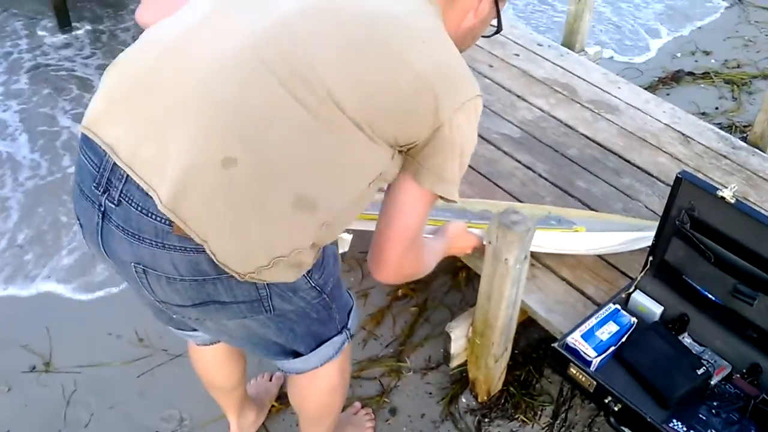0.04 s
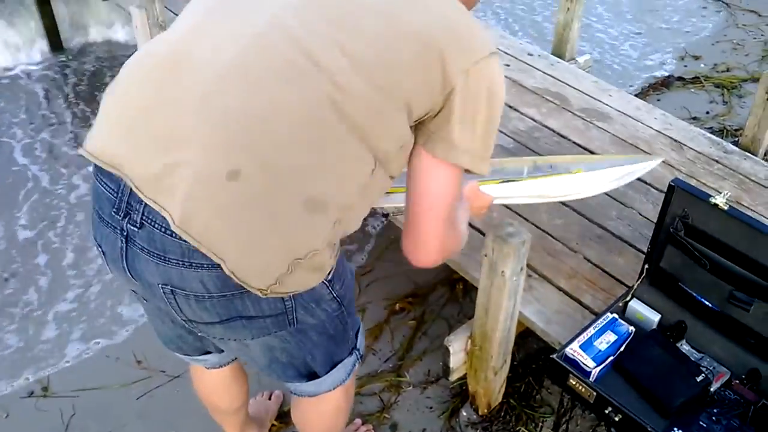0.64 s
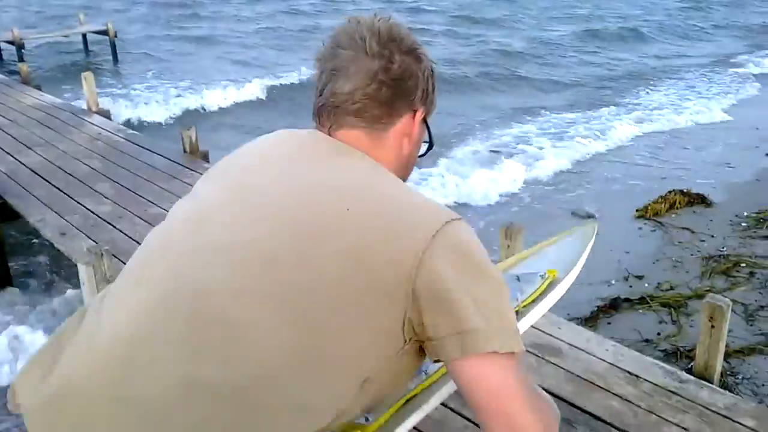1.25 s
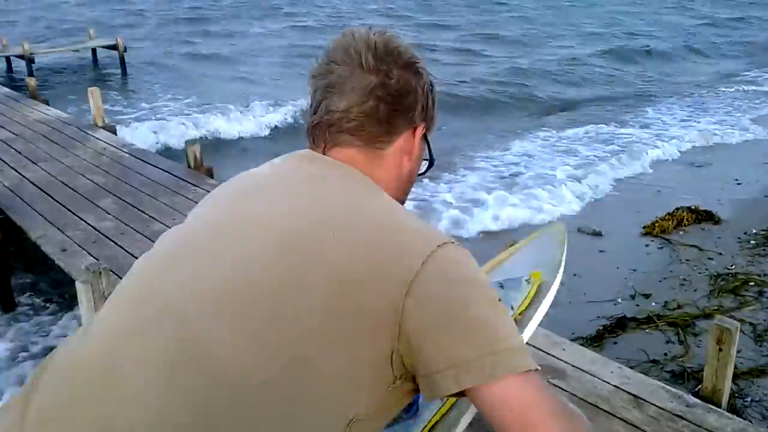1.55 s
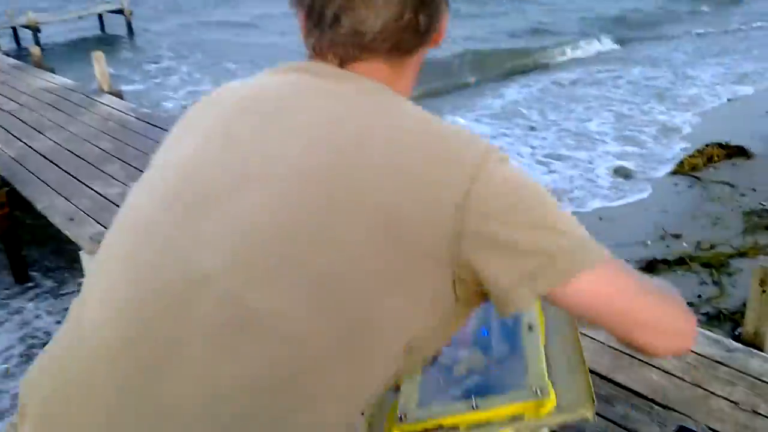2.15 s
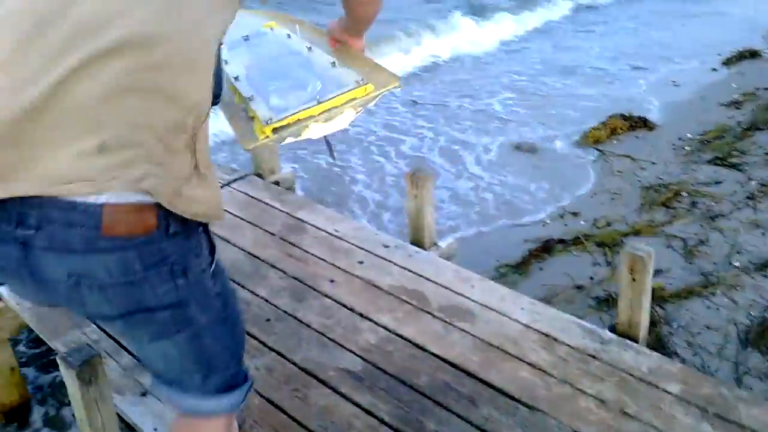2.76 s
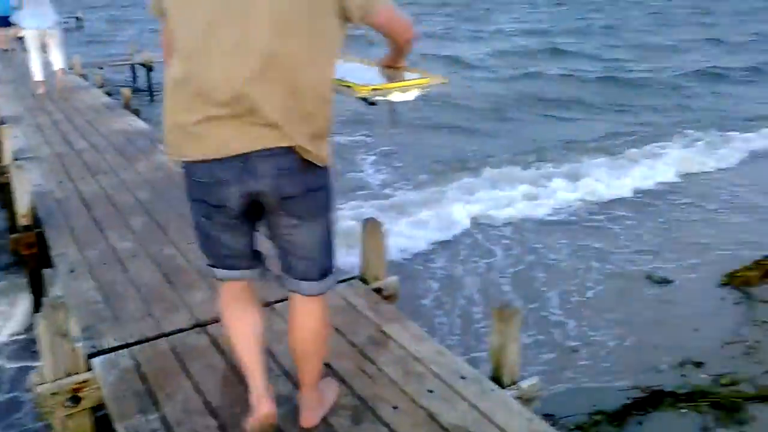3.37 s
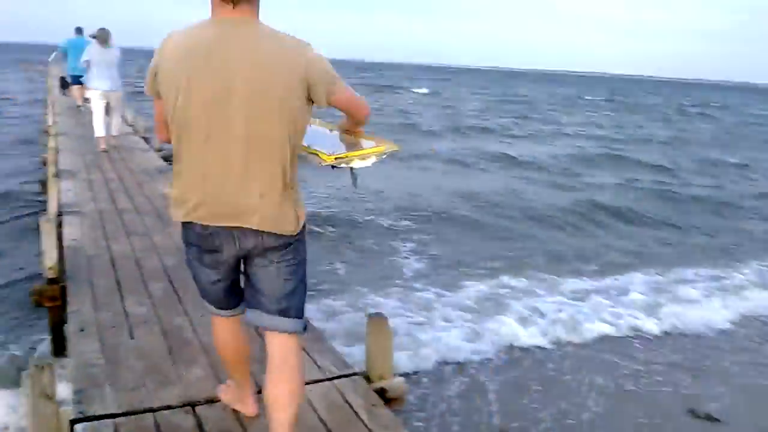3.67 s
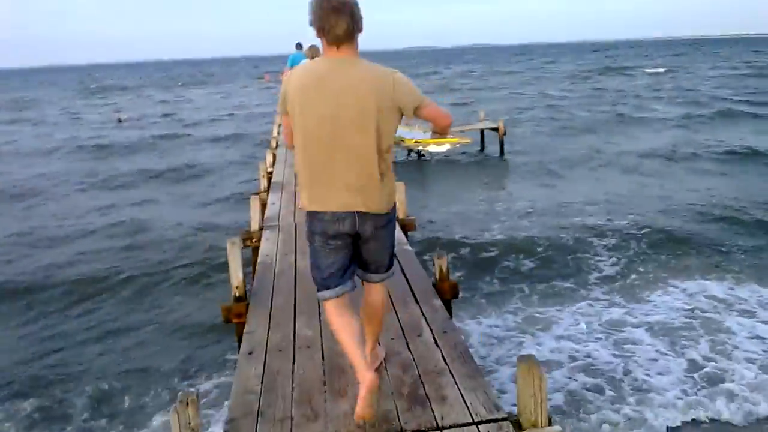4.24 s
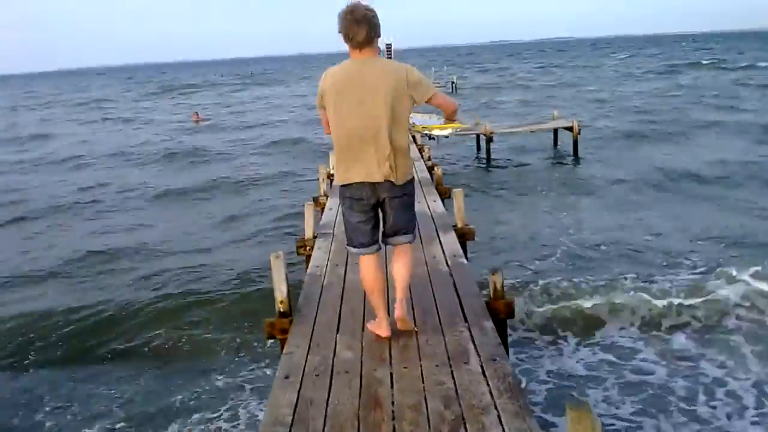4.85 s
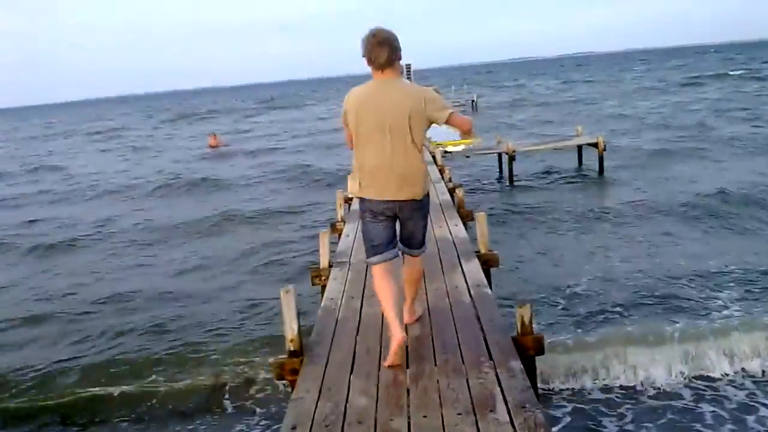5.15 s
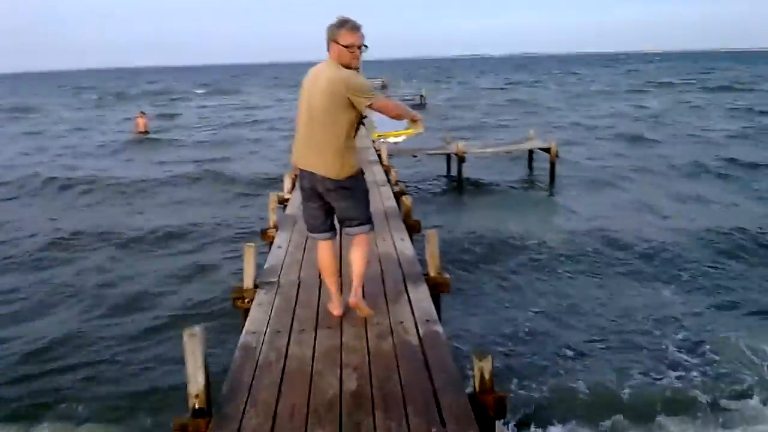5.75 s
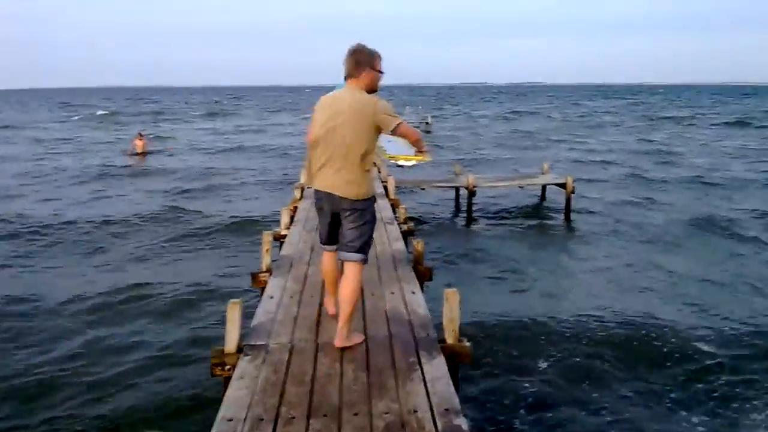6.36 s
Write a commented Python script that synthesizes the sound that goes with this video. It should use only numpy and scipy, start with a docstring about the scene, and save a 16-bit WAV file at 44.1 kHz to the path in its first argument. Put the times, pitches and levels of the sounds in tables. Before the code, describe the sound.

Continuous surf roars and fizzes along a beach, swelling and easing as water gulps and splashes around a wooden pier. Close up, gusting wind hits the microphone with a deep, fluttering rumble, irregular thumps that drop in pitch, and brief knocks and cracks. A sharp dry tick comes early. The wind gradually strengthens, and the splashing turns a little brighter near the end.

```python
"""Wind rumbles and thumps on a camera's microphone while surf runs up a beach beside a wooden pier.
The rumble roughens in the gusts; eddies strike the port with short thumps that drop in pitch,
and the flow snaps off with a knock and a crack. Each wave roars and fizzes at once as it breaks
and runs out. The wash has a hollow note near the shore and turns brighter over open water.
Water gulps and slops around the piles, and a few dry ticks sound at the microphone."""
import sys
import numpy as np
from scipy import signal
from scipy.fft import rfft, irfft
from scipy.io import wavfile
from scipy.ndimage import uniform_filter1d

SR = 44100
rng = np.random.default_rng(int(sys.argv[2]) if len(sys.argv) > 2 else 0)


def wav_record(signal):
    """Record a signal, one row per channel, as 16-bit PCM in the file named by sys.argv[1]."""
    frames = np.transpose(np.atleast_2d(signal))
    bounded = np.clip(frames, -1, 1)
    # unit amplitude maps onto the largest positive 16-bit level
    quanta = np.round(bounded * 32767).astype(np.int16)
    wavfile.write(sys.argv[1], SR, quanta)


N = 287091
T = np.arange(N) / SR


# Gusts. Each row: start in seconds, time until the fall in seconds, rumble in dB, extra flutter in dB.
WIND_GUSTS = [(0.574, 0.11, -27.5, -.5), (1.128, 0.33, -27, 0.5), (1.64, 0.21, -28.5, 3),
              (2.27, 0.076, -28, -10), (2.876, 0.14, -31.5, 0), (3.46, 0.43, -25, 2.5),
              (4.341, 0.33, -24, 0.5), (4.782, 0.33, -24.5, 1), (5.17, .11, -26, 5.5),
              (5.491, 0.33, -29.5, -1), (5.953, 0.23, -22.5, -1), (6.24, .28, -22, -10)]
def wind_levels():
    """Incoherent sources add in power: gusts over a freshening breeze set the rumble and flutter gains."""
    rise_s, fall_s = 0.026, 0.06
    rumble_power = gain_of(-35.5 + 1.39 * T) ** 2
    flutter_power = rumble_power * gain_of(-11) ** 2
    for start, hold, db, rough_db in WIND_GUSTS:
        rise = np.clip((T - start) / rise_s, 0, 1)
        fall = np.exp(-np.maximum(T - start - hold, 0) / fall_s)
        gust = gain_of(db) * rise * fall
        rumble_power += gust ** 2
        flutter_power += (gust * gain_of(rough_db - 7.5)) ** 2
    return np.sqrt(rumble_power), np.sqrt(flutter_power)


# Spectra of the wind. Each row: frequency in Hz, relative level in dB.
RUMBLE_SPECTRUM = [(8, -16.5), (22, -1.5), (38, 3), (54, 0), (66, -4), (85, -3), (110, -10), (160, -14),
                   (300, -44), (800, -80)]
FLUTTER_SPECTRUM = [(40, -58), (90, -1.5), (135, -2), (190, -5), (260, -11), (380, -18.5), (550, -22.5),
                    (900, -35.5), (2000, -55), (5000, -77)]
def wind():
    """Turbulence gives slow pressure swings; flow separation at the port adds clumps of flutter."""
    rumble_gain, flutter_gain = wind_levels()
    puffs = wander(14)  # shared by rumble and flutter
    rumble = coloured(rng.standard_normal(N), RUMBLE_SPECTRUM)
    rumble = steadied(rumble * gain_of(3.5 * puffs), seconds=0.25)
    clumps = gain_of(4.4 * wander(49))
    flutter = steadied(coloured(rng.standard_normal(N) * clumps, FLUTTER_SPECTRUM), seconds=0.13)
    return rumble_gain * rumble + flutter_gain * gain_of(1.35 * puffs) * flutter


# Spectrum of an eddy at speed 1. Each row: frequency in Hz, relative level in dB.
EDDY_SPECTRUM = [(30, -10.5), (90, 8), (170, -1.5), (260, 3.5), (400, -7), (650, -18.5), (1000, -26.5),
                 (1800, -34), (5000, -79)]
# Eddies striking the port. Each row: start in seconds, level in dB, length in seconds,
# speed as a factor on pitch, share of clean thump from 0 to 1.
EDDIES = [(0.03, -27, 0.031, 0.55, 0.34), (0.444, -17.5, 0.032, 0.16, 0.6), (0.609, -29, 0.077, 0.62, 0),
          (0.878, -25.5, 0.039, 0.19, 0.96), (1.047, -27.5, 0.056, 0.52, 0.15),
          (1.153, -23, 0.026, 0.4, 0.3), (1.214, -16, 0.062, 0.28, 0.72), (1.321, -19.5, 0.017, 0.55, 0.82),
          (1.343, -21.5, 0.032, 1.07, 0.44), (1.393, -21, 0.033, 0.234, 0.3),
          (1.506, -22.5, 0.036, 0.43, 0.6), (1.742, -21.5, 0.058, 0.53, 0.1),
          (2.046, -20.5, 0.032, 0.56, 0.72), (2.19, -17, 0.019, 0.62, 0.98), (2.2, -29, 0.014, 1.3, 0.1),
          (2.334, -26.5, 0.039, 1.1, 0.01), (2.426, -16.5, 0.037, 0.39, 0.67),
          (2.504, -16.5, 0.024, 0.67, 0.96), (2.527, -20, 0.019, 0.41, 0.54),
          (2.595, -23.5, 0.018, 0.98, 0), (2.607, -19, 0.023, 0.56, 0.75), (2.64, -17, .022, 0.19, .9),
          (2.779, -25.5, 0.021, 1.17, 0.38), (2.795, -22, 0.02, 0.29, 0.84),
          (2.893, -26, 0.025, 0.49, 0.17), (3.066, -16.5, 0.013, 0.17, 0.66), (3.161, -32, .03, 0.3, 0.8),
          (3.385, -25, 0.026, 0.35, 0.68), (3.532, -16.5, 0.055, 0.44, 0.88),
          (3.588, -16, 0.061, 0.48, 0.88), (3.646, -18, 0.069, 0.43, 0.66),
          (3.713, -17.5, 0.037, 0.43, 0.6), (3.732, -24.5, 0.043, 0.94, 0.03),
          (3.789, -26.5, .035, 0.68, 0), (3.91, -25, 0.02, 0.9, 0.06), (4.417, -25, 0.016, 1.18, 0.29),
          (4.49, -22, 0.029, .65, 0.73), (4.528, -12, 0.018, 0.6, 0.8), (4.568, -8.5, 0.047, 0.212, 0.94),
          (4.62, -22, 0.031, 1.09, 0.4), (4.744, -15, 0.026, 0.23, 0.96), (4.904, -27, 0.053, 0.85, 0.04),
          (5.044, -22, 0.022, 0.53, 0.7), (5.18, -30, 0.051, 0.79, 0), (5.239, -11, 0.029, 0.25, 0.85),
          (5.427, -15, 0.038, 0.222, 0.75), (5.458, -16, 0.016, 0.95, 0.36),
          (5.788, -21.5, 0.034, 0.53, 0.4), (5.994, -20, 0.023, 0.8, 0.6), (6.075, -19, 0.025, 1, 0.35),
          (6.098, -14, .02, 0.6, 0.85), (6.268, -10, 0.035, 0.29, 0.88), (6.277, -26, 0.011, 1.5, 0.01),
          (6.325, -21, 0.012, 0.6, 0.3), (6.421, -19.5, 0.018, 0.77, .5), (6.459, -20, 0.047, 0.57, 0.25)]
def buffets():
    """Frequency scales with flow speed: each eddy drops in pitch as it slows, and leaves a low wake."""
    strike_speed, spent_speed = 1.4, 0.608
    pressure = steadied(coloured(rng.standard_normal(N), EDDY_SPECTRUM), seconds=0.013)
    wake = steadied(coloured(rng.standard_normal(N), RUMBLE_SPECTRUM), seconds=0.059)
    unrest = wander(155)
    out = np.zeros(N)
    for start, db, length, speed, clean in EDDIES:
        near = (T >= start) & (T < start + 6 * length)
        t = T[near] - start
        pace = speed * (spent_speed + (strike_speed - spent_speed) * np.exp(-t / length))
        falling_noise = np.interp(start + np.cumsum(pace) / SR, T, pressure)
        rough = gain_of(-1.2) * eddy_force(t, length) * falling_noise
        rough += gain_of(-5.5) * eddy_force(t, 1.4 * length) * wake[near]
        thump = gain_of(-0.5) * eddy_thump(t, length, speed, unrest[near])
        out[near] += gain_of(db) * (np.sqrt(1 - clean) * rough + np.sqrt(clean) * thump)
    return out


def eddy_force(t, length):
    """A transient load builds quickly and falls more slowly, along a Gaussian curve."""
    attack_s = 0.11 * length
    return (1 - np.exp(-t / attack_s)) * np.exp(-(t / length) ** 2)


def eddy_thump(t, length, speed, unrest):
    """Damped oscillation: a square hit sets off pointed pressure swings that slow down and round off."""
    start_hz, end_hz, attack_s = 232.5 * speed, 35.2, 0.0011 / speed
    slowing = np.exp(-t / (0.556 * length))
    hz = (end_hz + (start_hz - end_hz) * slowing) * np.exp(0.231 * unrest)
    wave = np.sin(phase_of(hz))
    sharpness = 0.43 * np.sqrt(slowing)
    pointed = (wave - sharpness) / (1 - 2 * sharpness * wave + sharpness ** 2)
    envelope = (1 - np.exp(-t / attack_s)) * np.exp(-(t / (1.19 * length)) ** 2.3)
    return pointed * envelope


# Snaps at the port. Each row: start in seconds, knock level in dB, pitch in Hz, decay in seconds,
# crack level in dB.
FLOW_SNAPS = [(1.318, -15, 380, 0.0016, -36), (2.0432, -22, 310, 0.0037, -49),
              (2.1846, -18, 397, 0.0025, -40), (2.607, -19, 424, 0.0025, -30), (2.783, -23, 342, .003, -44),
              (3.5567, -17.5, 522, 0.0021, -36), (3.5635, -21, 614, 0.0027, -41),
              (3.8564, -16, 468, .003, -40), (4.633, -17.5, 424, 0.0044, -35.5),
              (5.456, -16, 380, 0.0018, -27), (6.096, -15, 480, .003, -24)]
def snaps():
    """Abrupt flow separation makes a knock and a dry crack of torn air, both gone in milliseconds."""
    crack_hz, width_hz, attack_s = 1077, 360, 0.00057
    phase = 2 * np.pi * crack_hz * T
    tearing = steadied(np.cos(phase) * wander(width_hz) + np.sin(phase) * wander(width_hz), seconds=.008)
    pitch_jitter = np.exp(0.24 * wander(320))
    out = np.zeros(N)
    for start, knock_db, hz, decay, crack_db in FLOW_SNAPS:
        near = (T >= start) & (T < start + .05)
        t = T[near] - start
        knock = gain_of(knock_db) * np.sin(phase_of(hz * pitch_jitter[near]))
        crack = gain_of(crack_db) * tearing[near]
        envelope = (1 - np.exp(-t / attack_s)) * np.exp(-t / decay)
        out[near] += envelope * (knock + crack)
    return out


# Spectra of breakers, foam and spray. Each row: frequency in Hz, relative level in dB.
ROAR_SPECTRUM = [(60, -33), (200, 11.5), (380, 6.5), (550, 1), (800, 1.5), (1100, 0), (1400, 1),
                 (1700, -0.5), (2300, -2), (3000, -7.5), (4000, -5.5), (6000, -44), (12000, -60)]
FOAM_SPECTRUM = [(1000, -72), (2500, -10), (3300, -17), (4300, -2.5), (5500, -2), (6300, 0), (6900, 0.5),
                 (7500, -3.5), (8300, -9.5), (10000, -17.5), (12000, -25), (16000, -30)]
SPRAY_SPECTRUM = [(5000, -34), (9000, -2), (11500, -4), (13500, -7.5), (16000, -7.5)]
# Waves breaking and running out. Each row: time in seconds, relative roar in dB, relative foam in dB.
WAVES = [(0, -47.5, -46.5), (.5, -48, -44.5), (.72, -42.5, -40.5), (.88, -44.8, -42.5), (1.1, -42.5, -41),
         (1.7, -47.5, -45.5), (2.2, -51, -47.7), (2.6, -47.5, -46.5), (3.1, -49.5, -44.5),
         (3.4, -44.5, -43), (3.52, -44, -43.5), (3.72, -45.5, -44.5), (4.1, -48, -47.5), (4.55, -49.5, -48),
         (4.7, -54.5, -49.5), (5.02, -56.5, -48.5), (5.15, -50, -45.5), (5.38, -47.8, -42.5),
         (5.75, -44, -42), (6.1, -44.5, -42.5), (6.5, -46.5, -44.5)]
# The finest spray, from the nearest foam. Each row: time in seconds, level in dB.
FINE_SPRAY = [(0, -63), (.9, -58.5), (1.9, -71), (2.45, -61.5), (3.65, -62), (4.3, -73), (4.8, -66),
              (5.4, -61), (6.5, -65)]
# The hollow note of the wash, gulps under the pier and bright splashes around the piles.
# Each row: time in seconds, centre frequency in Hz, level in dB.
HOLLOW_WASH = [(0, 912, -49.5), (.3, 899, -47), (.75, 890, -45.5), (1.1, 917, -50.5), (1.5, 906, -54),
               (2.2, 896, -57), (2.55, 839, -45.5), (2.9, 754.5, -48), (3.25, 697, -52.5), (3.6, 692, -53),
               (4.2, 648, -57.5), (5, 649.3, -52), (5.4, 722.5, -47), (6, 925, -49.5), (6.5, 938, -56)]
PIER_GULP = [(0, 344.6, -75), (.3, 392, -49), (.6, 372.5, -53), (1, 327, -50), (1.5, 329.7, -68.5),
             (6.5, 327.5, -43.5)]
PILE_SPLASH = [(0, 3300, -55.5), (.9, 3300, -62), (1.1, 4400, -53), (1.5, 4400, -61), (2.5, 3500, -55.5),
               (3.5, 3300, -59), (4.4, 3500, -66), (5.1, 3000, -71), (5.6, 2900, -56), (6, 2950, -52),
               (6.5, 2950, -51.5)]
def surf():
    """Superposition: countless bubbles merge into roar and hiss, joined by the resonances of the wash."""
    roar_db, foam_db = curves(WAVES)
    spray_db, = curves(FINE_SPRAY)
    roar = gain_of(roar_db + 4.5) * churn(ROAR_SPECTRUM, patchy_db=1.14, flicker_db=0.6)
    hiss = gain_of(foam_db - 0.5) * churn(FOAM_SPECTRUM, patchy_db=1.48, flicker_db=0.5)
    pops = bubbles(per_s=2600, spread_db=3.6, decay_cycles=2.5)
    crackle = gain_of(foam_db - 8.0) * unit_rms(coloured(pops, FOAM_SPECTRUM))
    spray = gain_of(spray_db) * churn(SPRAY_SPECTRUM, patchy_db=0.8, flicker_db=0.4)
    waver = gain_of(1.25 * wander(29))
    gurgle = waver * (wash(HOLLOW_WASH, width_hz=254) + wash(PIER_GULP, width_hz=86))
    slosh = gain_of(0.4 * wander(46))  # collapsing crests lift all of these layers at once
    splash = wash(PILE_SPLASH, width_hz=560)
    return slosh * (roar + hiss + crackle + spray + gurgle + splash)


def churn(spectrum, patchy_db, flicker_db):
    """Random modulation: patches of bubbles come and go, and splashes flicker across the whole band."""
    frames, hz = N // 256 + 5, np.fft.rfftfreq(1024, 1 / SR)
    real, imaginary, patches = rng.standard_normal((3, frames, len(hz)))
    patches = uniform_filter1d(patches, size=14, axis=0)  # smooth in time
    patches = unit_rms(uniform_filter1d(patches, size=10, axis=1))  # and in frequency
    spectra = (real + 1j * imaginary) * gain_of(level_at(spectrum, hz) + patchy_db * patches)
    water = signal.istft(spectra.T, nperseg=1024, noverlap=768)[1][:N]
    return unit_rms(water * gain_of(flicker_db * wander(43)))


def bubbles(per_s, spread_db, decay_cycles):
    """Bursting bubbles ring as heavily damped resonators, a few much louder than the rest."""
    pitches = np.geomspace(1500, 14000, 24)
    t = np.arange(500) / SR
    out = np.zeros(N)
    for hz in pitches:
        bursts = rng.random(N) < per_s / len(pitches) / SR
        strength = gain_of(spread_db * np.minimum(rng.exponential(1, N), 4))
        ring = np.sin(2 * np.pi * hz * t) * np.exp(-hz * t / decay_cycles) * hz
        out += signal.oaconvolve(bursts * strength, ring)[:N]
    return unit_rms(out)


def wash(rows, width_hz):
    """Moving water sounds in one broad resonance that drifts in pitch and level."""
    hz, db = curves(rows)
    return gain_of(db) * unit_rms(noise_band(hz, width_hz))


# Wavelets against the piles. Each row: start in seconds, length in seconds, centre frequency in Hz,
# width in Hz, level in dB.
WAVELETS = [(0.246, 0.14, 424, 60, -43.5), (.68, 0.111, 954, 380, -46), (.93, 0.11, 1047, 300, -47),
            (2.92, 0.2005, 733, 170, -49), (3.161, .17, 692, 105, -45)]
def slops():
    """Cavity resonance: each slop swells and fades, its pitch climbing as the air pocket closes."""
    pitch_rise = .08
    out = np.zeros(N)
    for start, length, hz, width_hz, db in WAVELETS:
        progress = np.clip((T - start) / length, 0, 1)
        rising_hz = hz * (1 + pitch_rise * (progress - .5))
        water = steadied(noise_band(rising_hz, width_hz), seconds=.1)
        out += gain_of(db) * np.sin(np.pi * progress) * water
    return out


# Dry ticks at the microphone. Each row: start in seconds, peak level in dB.
DRY_TICKS = [(0.85, -37), (1.469, -18), (4.112, -29)]
def ticks():
    """Exponential relaxation: a pressure step leaks away in a fraction of a millisecond."""
    return sum(gain_of(db) * (T >= start) * np.exp(-abs(T - start) / .0001) for start, db in DRY_TICKS)


def gain_of(db):
    """Amplitude grows tenfold every 20 dB."""
    return 10 ** (np.asarray(db) / 20)


def unit_rms(x):
    """Normalisation to an rms of 1."""
    return x / np.sqrt(np.mean(x ** 2) + 1e-20)


def phase_of(hz):
    """Phase is the integral of frequency."""
    return 2 * np.pi * np.cumsum(hz) / SR


def level_at(spectrum, hz):
    """Interpolation of a spectrum on a log-frequency axis."""
    f, db = np.transpose(spectrum)
    return np.interp(np.log(hz + 1), np.log(f + 1), db)


def curves(rows):
    """Linear interpolation of each column over time."""
    times, *columns = np.transpose(rows)
    return [np.interp(T, times, column) for column in columns]


def coloured(x, spectrum):
    """Filtering is multiplication in the frequency domain."""
    return irfft(rfft(x) * gain_of(level_at(spectrum, np.fft.rfftfreq(N, 1 / SR))), N)


def wander(hz):
    """Low-pass noise of unit rms moves no faster than about hz."""
    f = np.fft.rfftfreq(N, 1 / SR)
    return unit_rms(irfft(rfft(rng.standard_normal(N)) * np.exp(-(f / hz) ** 2), N))


def noise_band(hz, width_hz):
    """Quadrature modulation shifts slow noise into a band around hz."""
    return (np.exp(1j * phase_of(hz)) * (wander(width_hz) + 1j * wander(width_hz))).real


def steadied(x, seconds):
    """Division by the running rms holds the slow level at 1 and keeps the quick lumps."""
    window = signal.windows.hann(int(seconds * SR) + 3)
    power = signal.fftconvolve(x ** 2, window, "same") / signal.fftconvolve(np.ones(N), window, "same")
    return x / np.sqrt(abs(power) + 1e-20)


def scene():
    """The pressures of sea and wind add at one microphone."""
    return (surf() + wind() + buffets() + snaps() + slops() + ticks())[None]


def record(dry):
    """A low-pass filter sets the recorder's band limit."""
    edge_hz = 15750
    low_pass = signal.firwin(511, edge_hz, window=("kaiser", 9), fs=SR)
    return signal.oaconvolve(dry, low_pass[None], "same")


dry = scene()
out = record(dry)
wav_record(out)
```